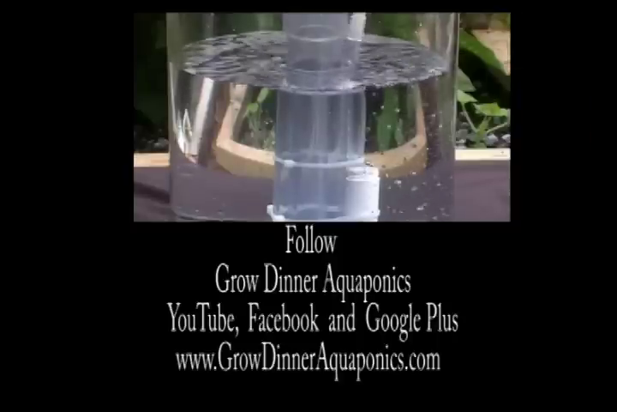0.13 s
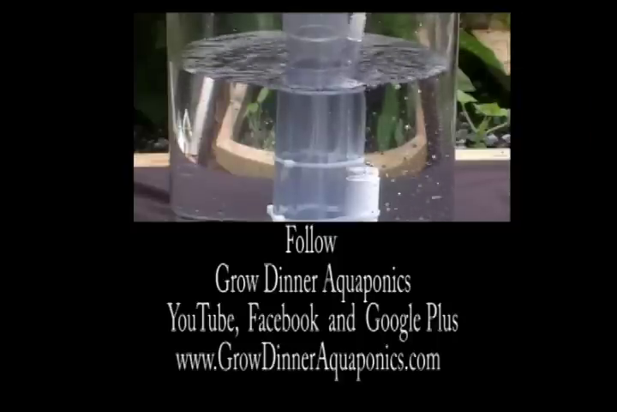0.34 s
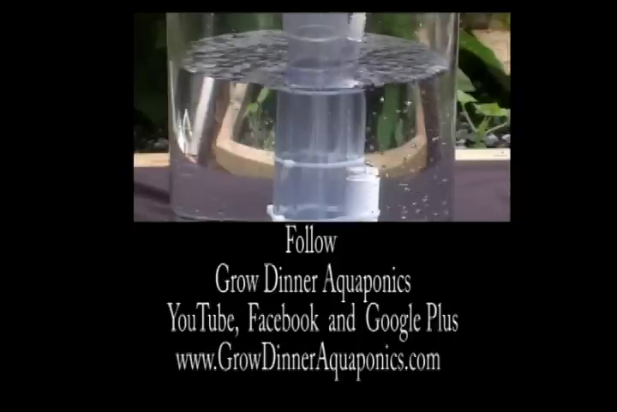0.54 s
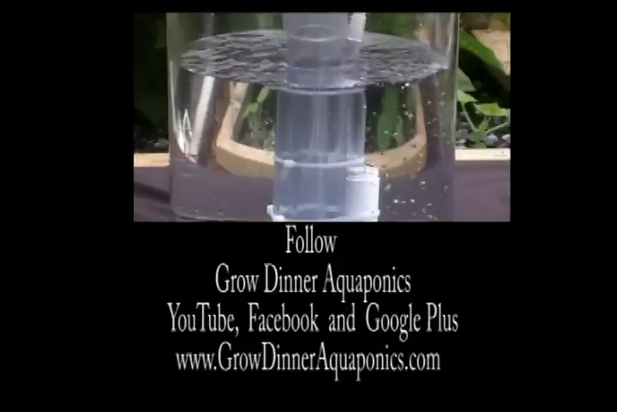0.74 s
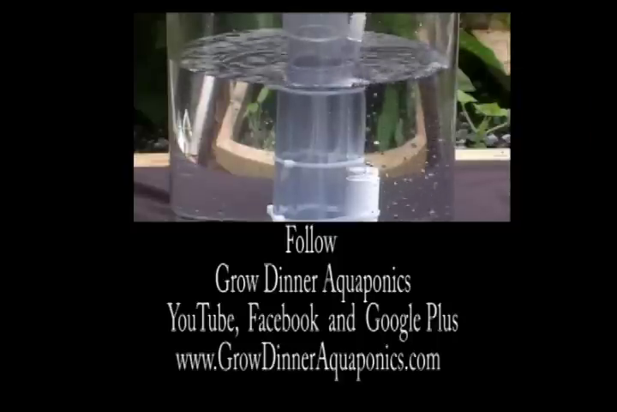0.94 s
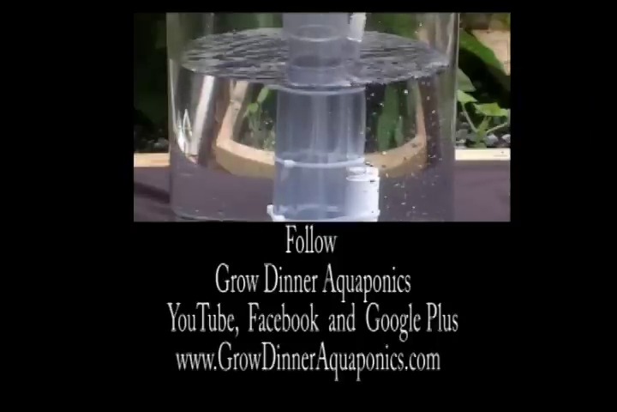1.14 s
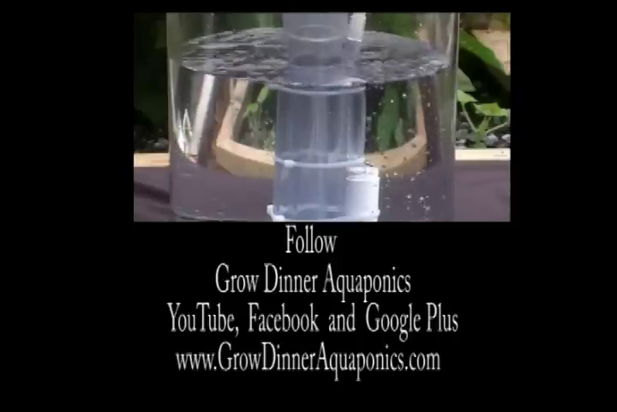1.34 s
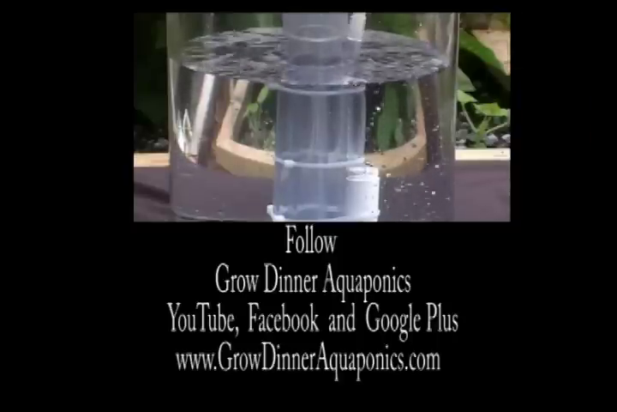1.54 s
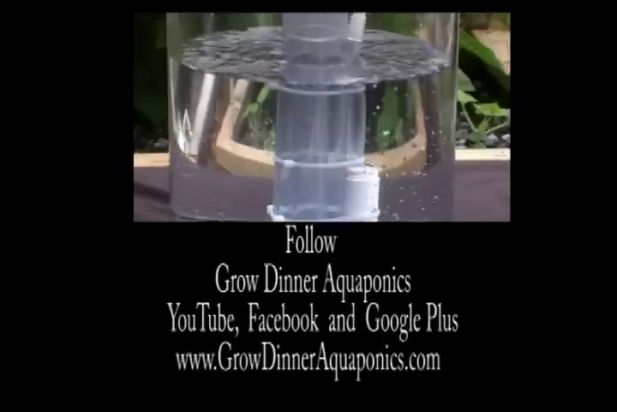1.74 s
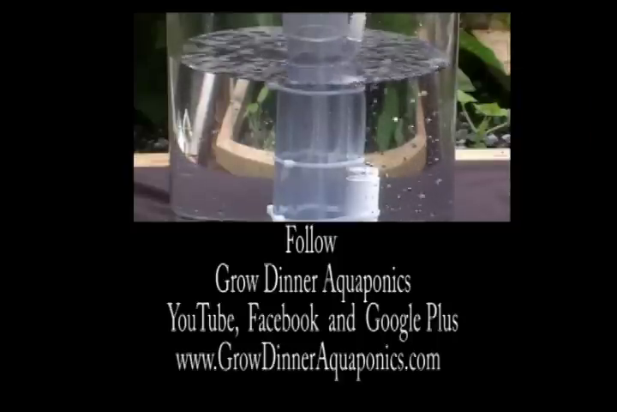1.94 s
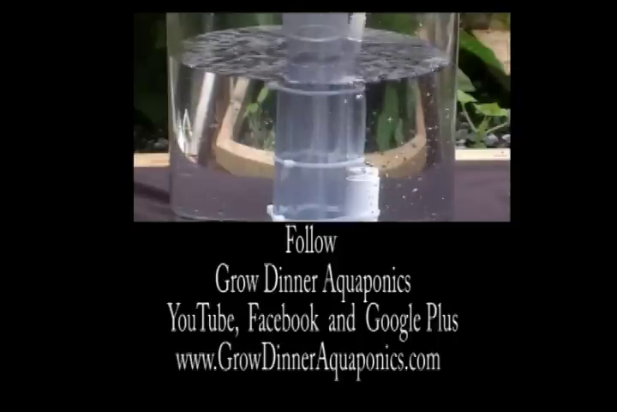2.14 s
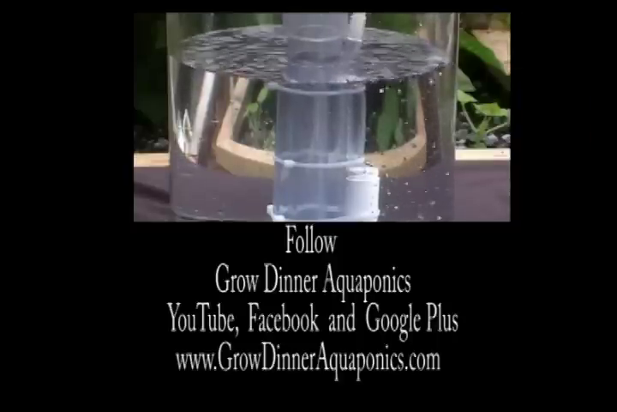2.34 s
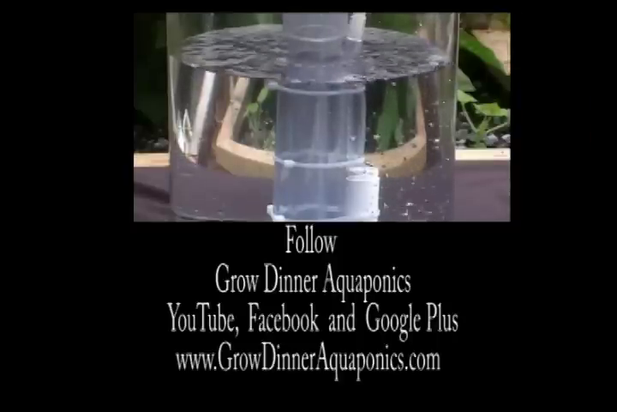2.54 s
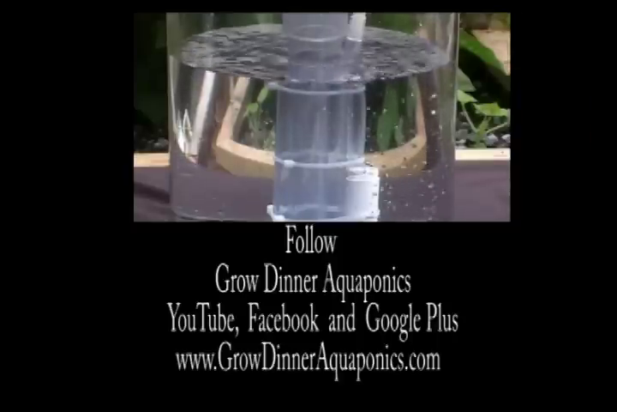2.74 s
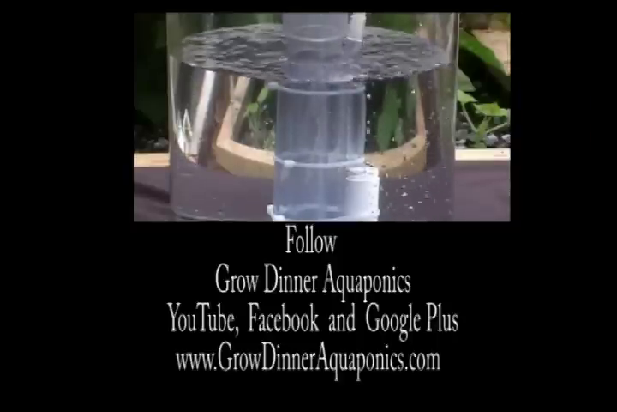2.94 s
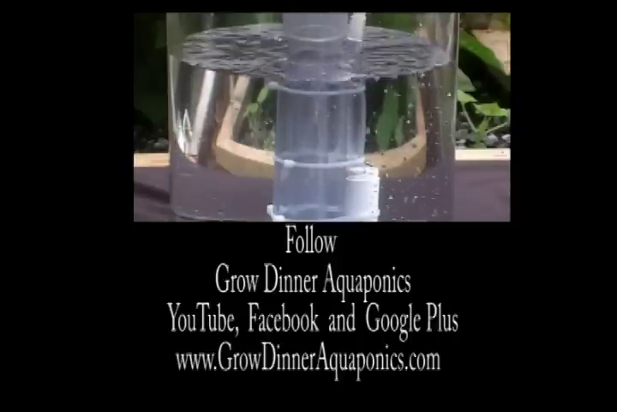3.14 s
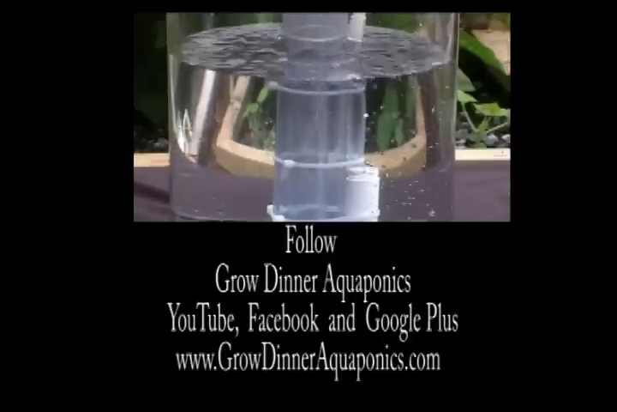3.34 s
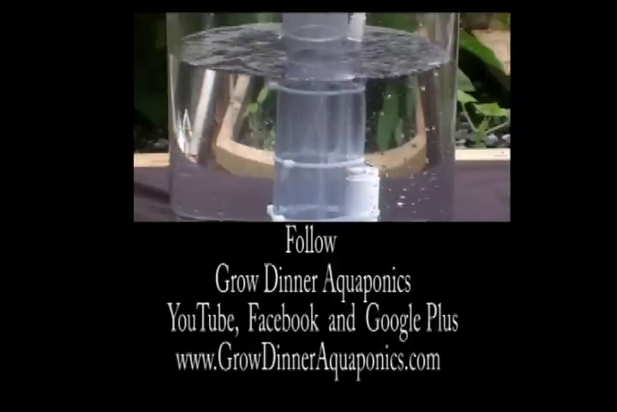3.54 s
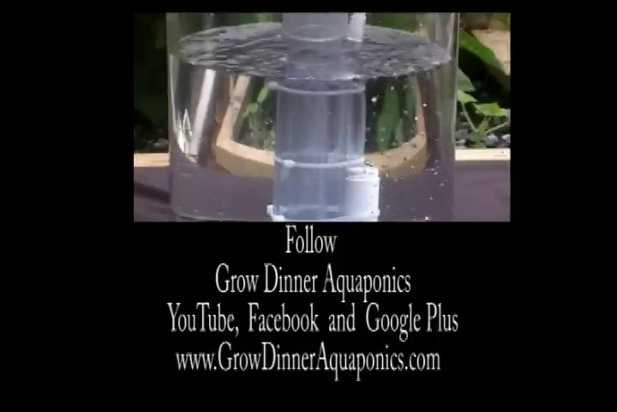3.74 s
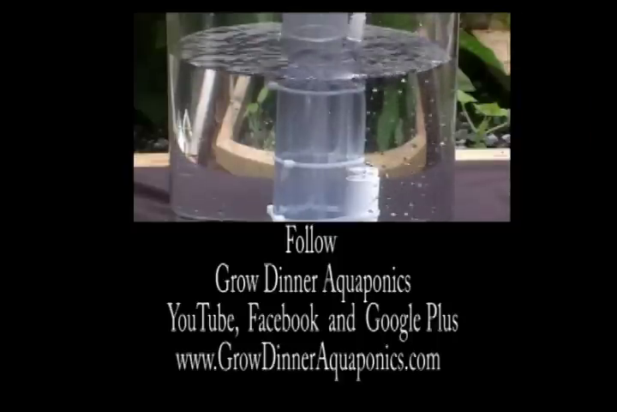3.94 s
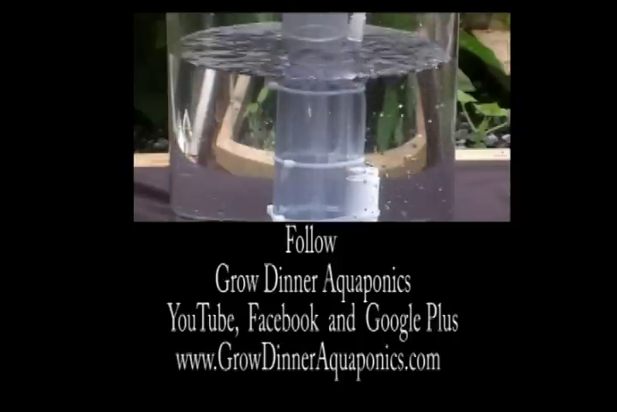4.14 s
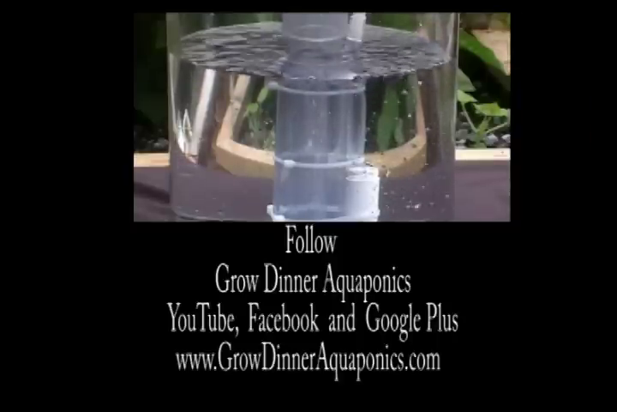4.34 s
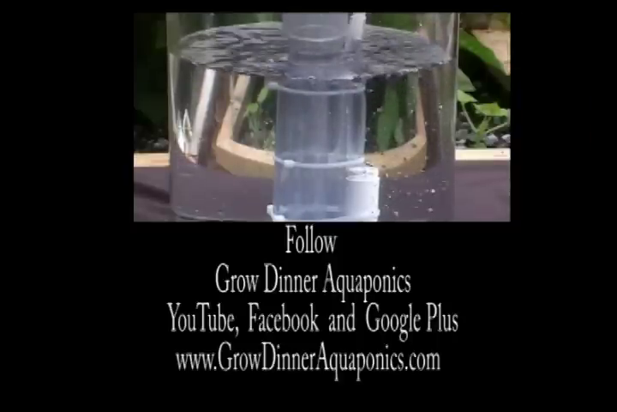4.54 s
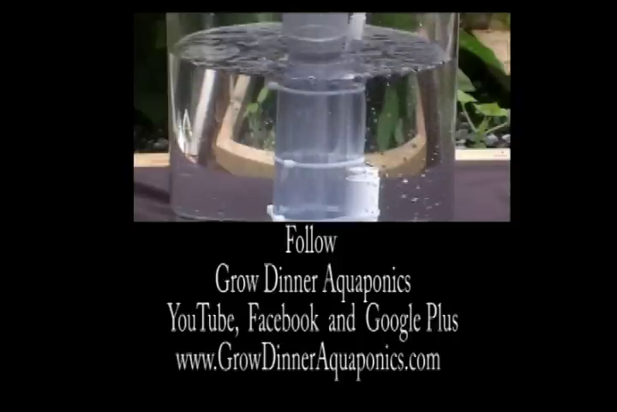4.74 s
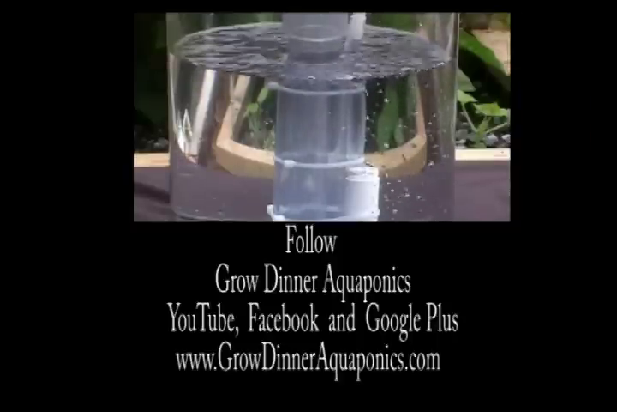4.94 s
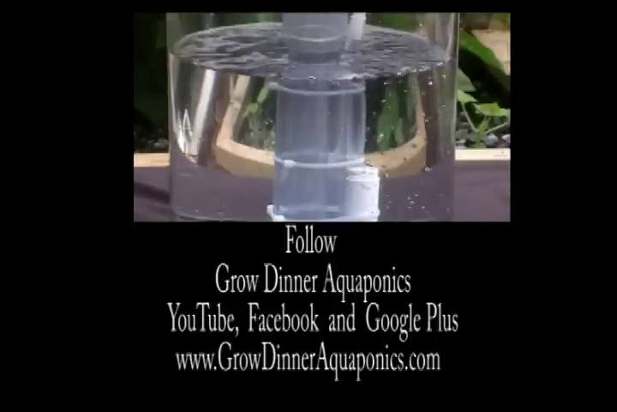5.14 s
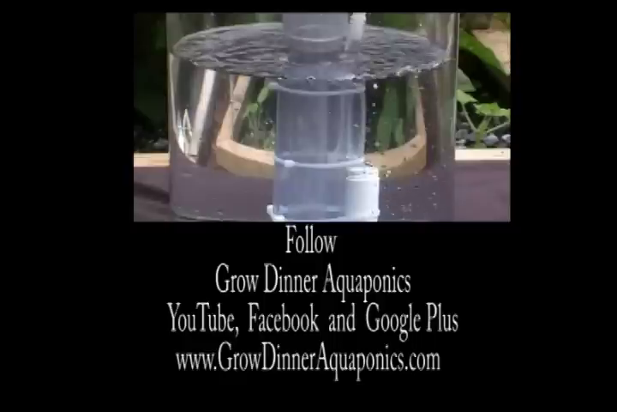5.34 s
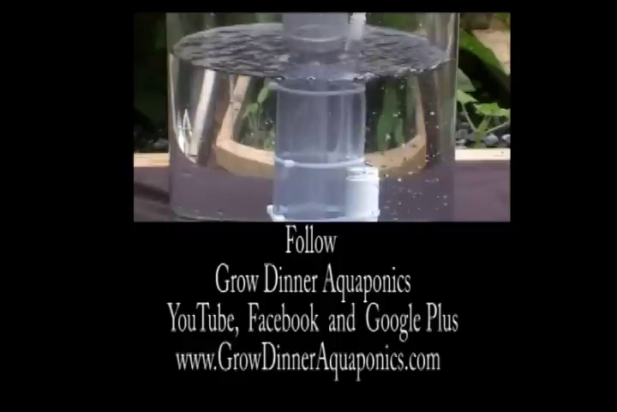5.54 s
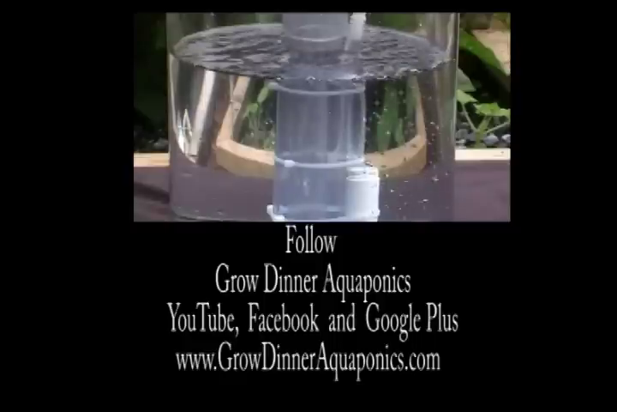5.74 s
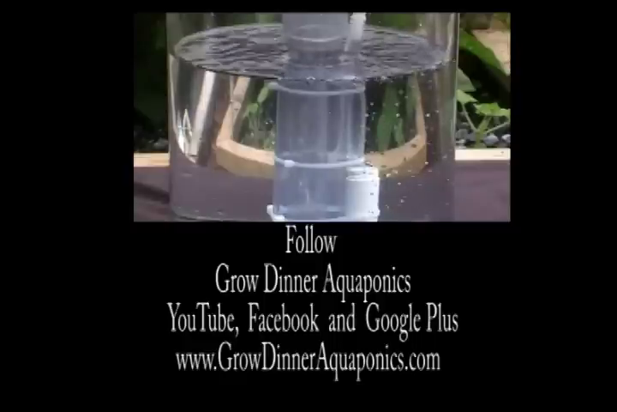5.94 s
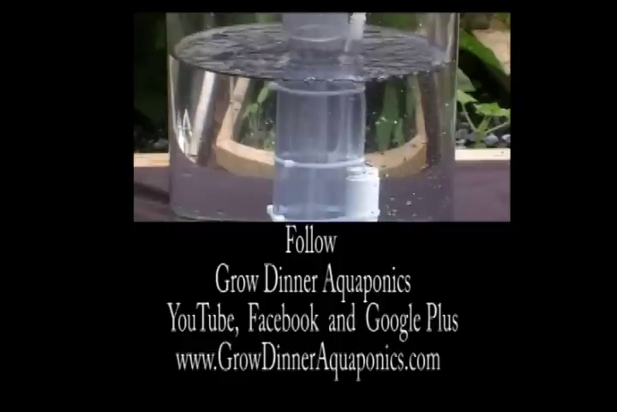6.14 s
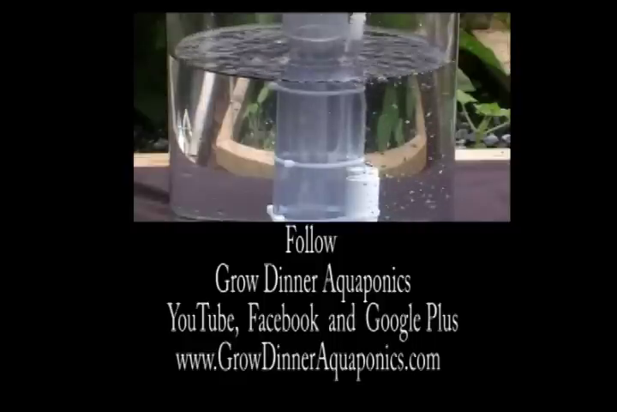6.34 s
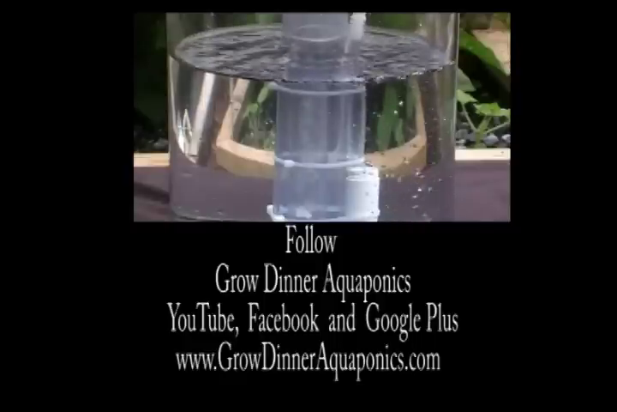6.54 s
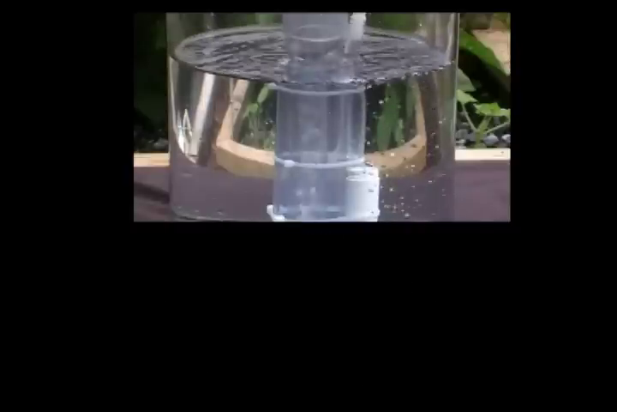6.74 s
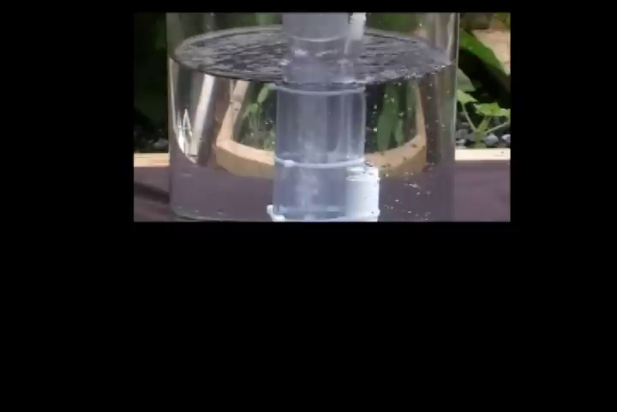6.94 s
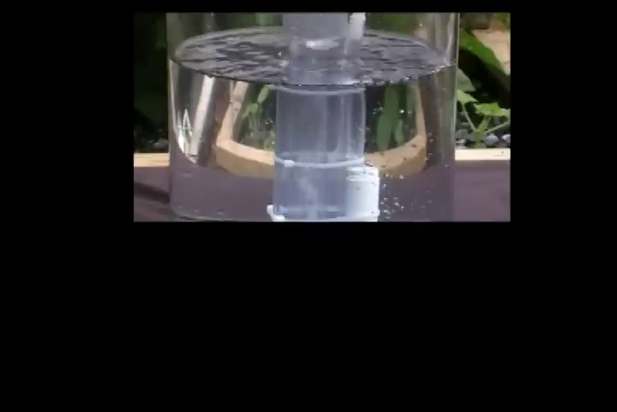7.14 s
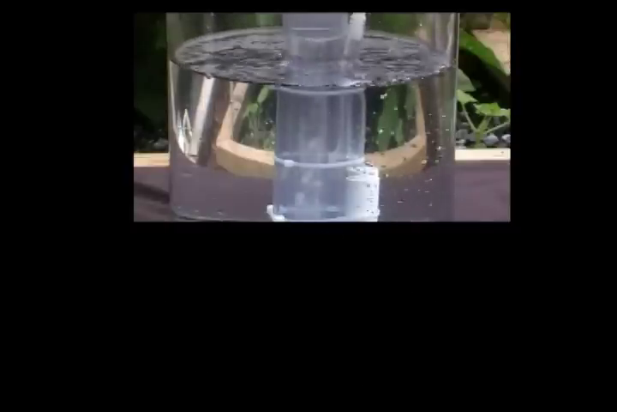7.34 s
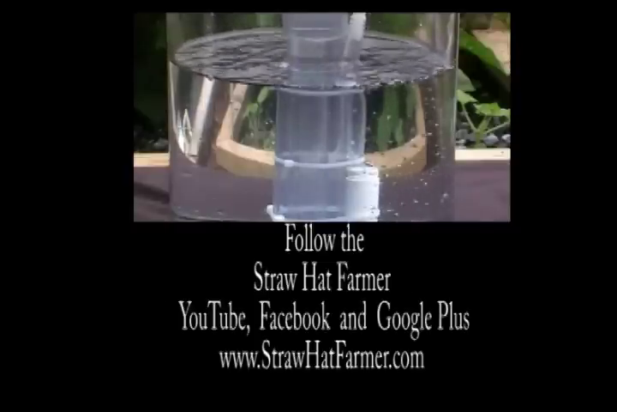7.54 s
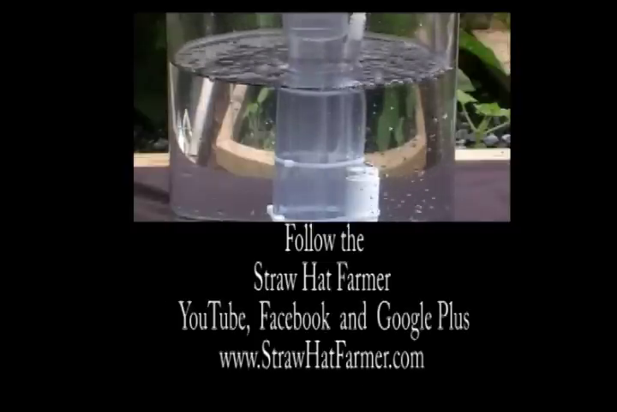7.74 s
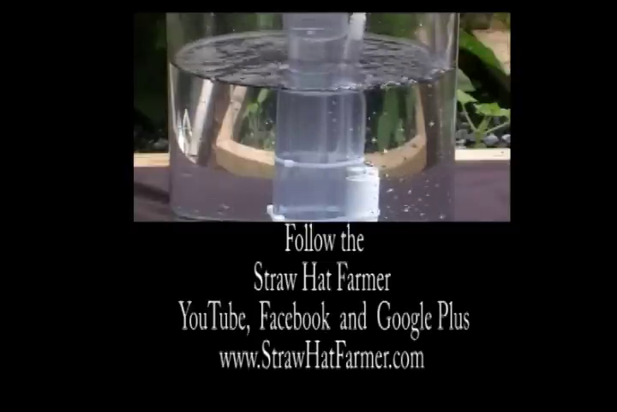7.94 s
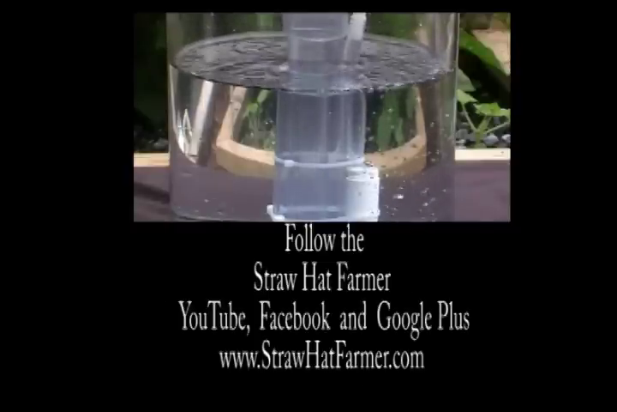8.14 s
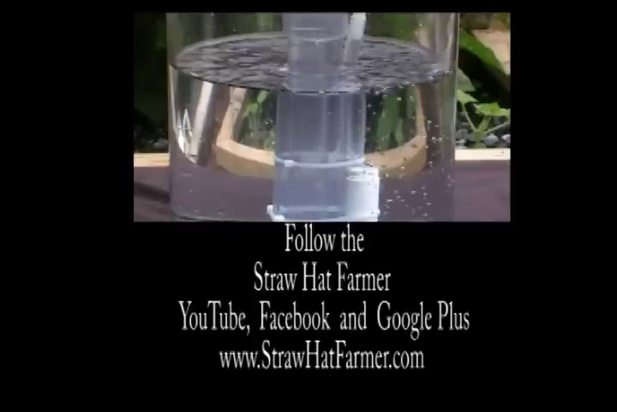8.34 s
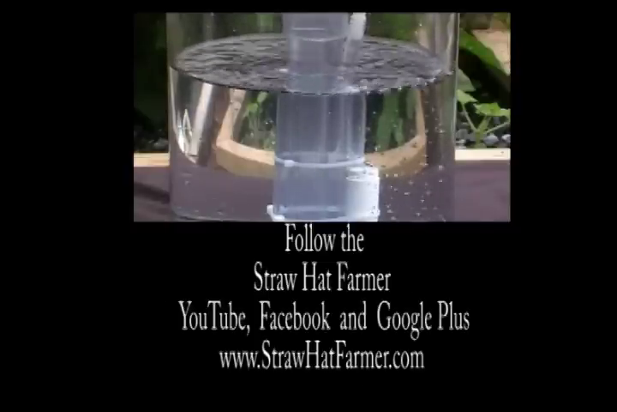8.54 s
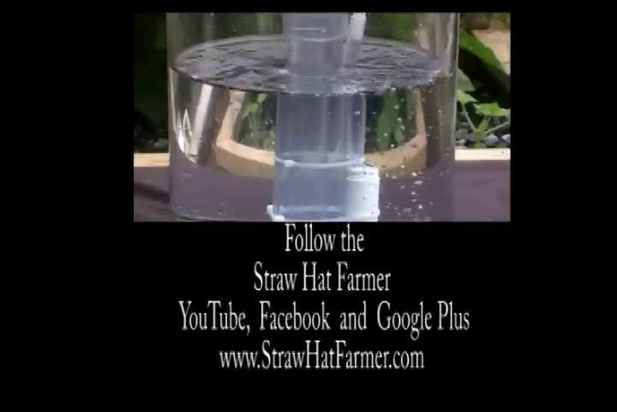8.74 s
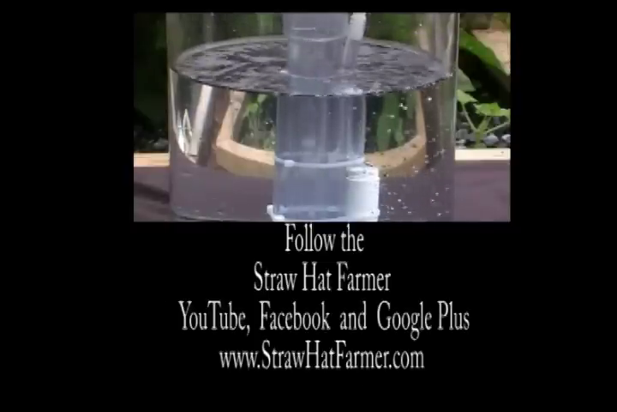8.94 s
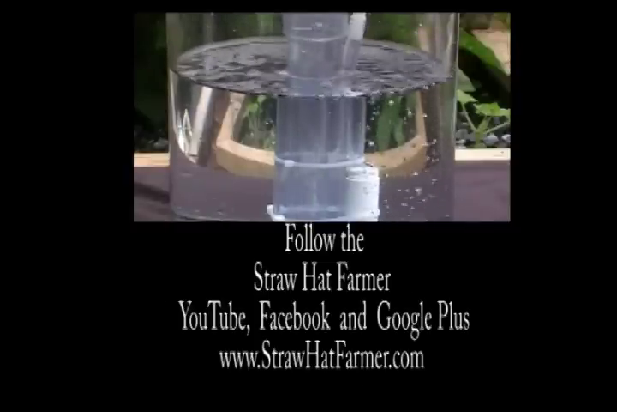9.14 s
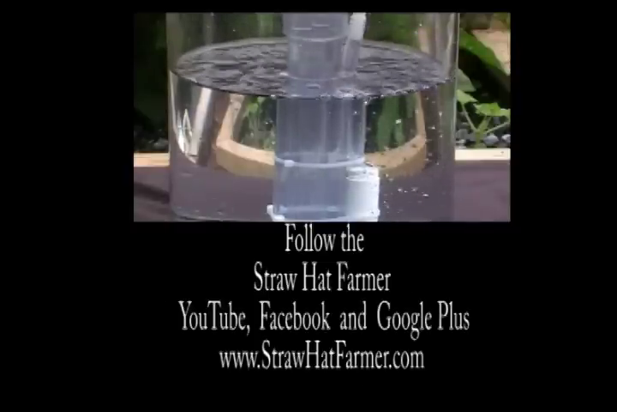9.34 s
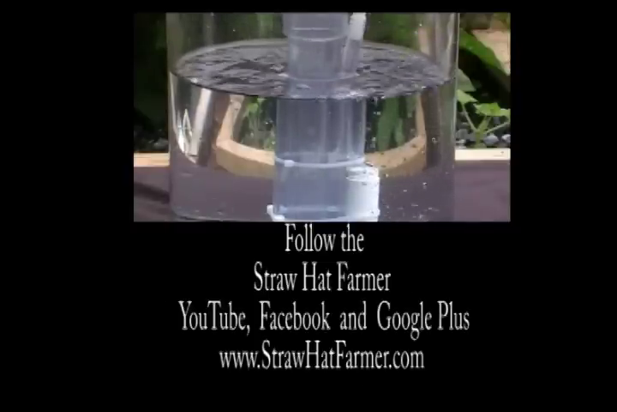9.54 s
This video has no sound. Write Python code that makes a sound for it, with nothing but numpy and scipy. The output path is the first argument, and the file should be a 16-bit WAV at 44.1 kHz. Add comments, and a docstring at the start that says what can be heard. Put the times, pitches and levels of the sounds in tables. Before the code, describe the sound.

From 0 to 4 s a quiet outdoor garden: soft wide airy hiss, a nearby trickle that swells gently at the start and again near 3 s, small clear drips with rising pitch, a thin high cricket chirping about thirteen times a second, faint steady insect whines, and low hums like far engines coming and going. At about 4.2 s a siphon begins drawing air: first separate small spits, high bubble pips and short sliding gurgles. From 5 s the bursts come faster and harder, and by 6 s it is a loud, irregular, wet sputter, with bright spray, sharp slurps, ringing air pockets and a hollow standpipe resonance, over churning low water and deep plops. Near 7 s a deeper churn joins, then sinks. The slurping rush carries on to the end at about 9.5 s, close and central, masking the garden.

```python
"""A garden, where a bell siphon drains a water tank. At first there is mostly a nearby trickle with its drops,
insects and far traffic, made of coloured noise, fizzing resonators, narrow whines and low hums.
From about 4 s the siphon draws air: slugs of water spit and slurp as bursts of banded noise, the standpipe
rings as resonant modes, and bubbles and low plops sound as short sines that climb in pitch."""
import sys
import numpy as np
from scipy import signal
from scipy.fft import rfft, irfft, next_fast_len
from scipy.io import wavfile

SR = 44100
rng = np.random.default_rng(int(sys.argv[2]) if len(sys.argv) > 2 else 0)


def digitize_waveform(pressure):
    """Quantize a signal to 16-bit integers and store it at the path in sys.argv[1].

    Rows of a 2-D input are taken as channels; values are limited to [-1, 1].
    """
    field = np.atleast_2d(pressure).T
    bounded = np.clip(field, -1, 1)
    quanta = np.round(bounded * 32767).astype(np.int16)
    wavfile.write(sys.argv[1], SR, quanta)


N = 422478   # length in samples

# loudest slugs of water bursting at the pipe mouth:
# (t/s, nominal peak level/dB, brightness/dB per octave, t60/s)
LOUD_SPITS = [(4.2561, -26, -1, 0.074), (4.306, -18.5, -2.5, 0.02), (4.3516, -28, 5, 0.027),
              (4.418, -17, -6.5, 0.031), (4.526, -17, -2, 0.023), (4.61, -20, 5, 0.021),
              (4.6556, -18.5, -4.5, 0.03), (4.77, -15.5, 2, 0.019), (4.8576, -12.5, -4, 0.025),
              (4.88, -14, -4, 0.027), (5.086, -15, -5, 0.036), (5.142, -12.5, -3, 0.023),
              (5.211, -12, 2, 0.019), (5.275, -19.5, 7, 0.039), (5.297, -20.5, 3, 0.067),
              (5.324, -19, 0, 0.025), (5.3706, -15, 1, 0.021), (5.429, -9.5, -2.5, 0.023),
              (5.471, -13.5, 10, 0.031), (5.5283, -13, 0.5, 0.033), (5.5926, -10.5, -1, 0.052),
              (5.238, -24, -5, 0.03), (5.257, -23, -4, 0.018), (4.734, -21.5, -6, 0.026),
              (5.6827, -24, -6, 0.035), (5.717, -17, 5, 0.048), (5.7572, -7.5, 5, 0.017),
              (5.7895, -26, -8, 0.13), (5.9584, -6, -2, 0.018), (5.9916, -14, 8, 0.019),
              (6.0106, -31, 9, 0.019), (6.055, -16.5, -5.5, 0.042), (6.158, -10, -2, 0.025),
              (6.1837, -22.5, 17, 0.02), (6.284, -13, 4, 0.014), (6.348, -10.5, 2.5, 0.048),
              (6.3867, -14, 2, 0.039), (6.403, -9, 2.5, 0.016), (6.433, -19, 8, 0.026),
              (6.47, -9, -1, 0.017), (6.496, -3.5, -4, 0.019), (6.5246, -19, -4, 0.026),
              (6.5716, -12.5, 1, 0.028), (6.5963, -16, -2, 0.034), (6.62, -12.5, 6, 0.032),
              (6.653, -17.5, 4, 0.059), (6.717, -13, 0, 0.051), (6.7572, -6.5, -2, 0.014),
              (6.815, -13.5, -1, 0.1), (6.9694, -23, -4, 0.015), (7.092, -14, -5, 0.021),
              (7.121, -14, 5, 0.028), (7.1989, -15.5, -9.5, 0.024), (7.2654, -9.5, -5, 0.055),
              (7.2775, -16.5, 3.5, 0.024), (7.357, -8, -3, 0.016), (7.3924, -5, 2, 0.016),
              (7.4209, -20, -8.5, 0.038), (7.5, -16.5, -4, 0.034), (7.5453, -17, 12, 0.016),
              (7.643, -29, 13, 0.024), (7.687, -20, -11, 0.022), (7.7055, -9, -2.5, 0.035),
              (7.7814, -18.5, -9.5, 0.01), (7.833, -11.5, -1, 0.025), (7.914, -17, 6, 0.061),
              (7.931, -14.5, 0.5, 0.065), (8.084, -11.5, -1, 0.049), (8.188, -19, 0, 0.038),
              (8.214, -9.5, 1.5, 0.022), (8.3912, -8.5, -6, 0.023), (8.427, -13, -3, 0.022),
              (8.52, -14, 1, 0.029), (8.5547, -10, -2, 0.016), (8.6586, -16.5, -4, 0.11),
              (8.691, -19, -1, 0.047), (8.725, -16.5, 9, 0.035), (8.741, -13.5, 3, 0.059),
              (8.8265, -5.5, 0, 0.039), (8.937, -10, 2, 0.041), (8.9894, -16, 4, 0.044),
              (9.035, -12, 1, 0.028), (9.104, -13, 4, 0.027), (9.125, -15, 7, 0.03),
              (9.2023, -10, 4, 0.022), (9.2424, -13, 1, 0.034), (9.3031, -21, -3, 0.073),
              (9.36, -11, -4, 0.022), (9.464, -19, -8, 0.024), (9.481, -24, -4, 0.018),
              (9.5116, -14, 1, 0.032), (4.2113, -31, 5, 0.033), (4.4403, -15, 4, 0.021),
              (4.4872, -24, 2, 0.019), (4.936, -21, -7, 0.041), (4.9764, -27, -9.5, 0.021),
              (5.057, -20, 5, 0.024), (5.1025, -12, -2, 0.032), (5.3344, -18.5, -7, 0.043)]
# loudest ringing air pockets: (t/s, peak level before the tone gain/dB, starting f/Hz)
LOUD_BUBBLES = [(4.351, -13, 4430), (4.4178, -11, 4300), (4.315, -35, 2270), (4.527, -17, 3140),
                (4.529, -24, 2200), (4.567, -29, 2280), (4.6167, -10, 3760), (4.657, -16, 2780),
                (4.746, -21, 3100), (4.796, -24, 2740), (4.8586, -14, 4200), (4.899, -18, 1790),
                (4.978, -17, 2880), (5.092, -8.5, 2580), (5.112, -16, 2600), (5.1447, -21, 2350),
                (5.175, -23, 2320), (5.221, -24.5, 1800), (5.124, -21, 1430), (5.335, -17.5, 2950),
                (5.3714, -24, 1950), (5.4013, -20, 1820), (5.432, -19, 2590), (5.477, -12, 2430),
                (5.495, -16.5, 2500), (5.537, -16, 2630), (5.55, -24, 2340), (5.5769, -24, 4500),
                (5.5922, -7, 3350), (5.6323, -18, 1540), (5.661, -14, 2700), (5.677, -20, 990),
                (5.7448, -12.5, 1750), (5.8004, -15, 2180), (5.865, -13.5, 2350), (5.9935, -22, 3780),
                (6.0114, -1, 3420), (6.0588, -26, 2320), (6.1616, -29, 2270), (6.223, -17, 1900),
                (6.2479, -19, 3750), (6.3098, -17, 3900), (6.3987, -13, 2440), (6.471, -31, 1880),
                (6.498, -10.5, 1880), (6.6196, -23, 1790), (6.661, -6, 1835), (6.757, -4, 3580),
                (6.7827, -18, 1470), (6.822, -4.5, 1740), (6.9139, -12, 1790), (7.267, -16, 2620),
                (7.394, -18, 1890), (7.4697, -17, 1140), (7.5426, -7, 4300), (7.5664, -24, 1160),
                (7.8338, -13, 2200), (7.939, -10.5, 1950), (8.0526, -17, 1028), (8.265, -25, 1080),
                (8.289, -25, 1055), (8.392, -14, 1950), (8.441, -16, 1063), (8.6719, -15, 1880),
                (8.692, -9, 1690), (8.819, -16, 1680), (8.8775, -8.5, 2080), (9.186, -14, 1480),
                (9.2088, -9, 2180), (9.275, -12.5, 1033), (9.3274, -12.5, 1930), (9.3933, -15, 2220),
                (9.4807, -15, 1670)]
STEADY_DRAW_S = 6   # from here on the small random spits and bubbles crowd in


def siphon():
    """Spray, pipe, churn and small bubbles follow the draw of air; a faint delayed copy widens the sound a little."""
    # strength of the draw under the single spits: (t/s, spray level/dB, pipe level/dB)
    draw = [(4.2, -41.5, -61), (4.46, -43.5, -47.5), (4.88, -40, -82), (5.51, -37, -38.5),
            (5.93, -30, -31.5), (6.62, -35.5, -33.5), (6.97, -34.5, -31.5), (7.81, -33, -31.5),
            (8.46, -34.5, -31), (8.58, -34, -28.5), (9.58, -33, -32)]
    # spectrum of the delayed copy in the side channel: (f/Hz, side minus mid level/dB)
    copy_side = [(60, -17), (500, -24), (1200, -76), (15000, -39)]
    spray_db, pipe_db = level_curves(draw)
    shared = surges(per_s=70, spread_db=3.0, t60=.06, rise_s=.004)
    mid = spray(spray_db, shared) + pipe(pipe_db, shared)
    mid += bubbles(pipe_db) + low_plops() + clusters() + slides()
    mid += churn(pipe_db) + deep_churn()
    delayed = np.roll(mid, 310)   # 7 ms
    delayed_copy = filtered(delayed, lambda hz: at_hz(copy_side, hz))
    return mid + delayed_copy * [[1], [-1]]


def spray(spray_db, shared):
    """Hiss and fine bubbles in bands: each spit has its own tilt and reaches the bands unevenly."""
    # colour of the spray: (f/Hz, level/dB per Hz)
    spray_colour = [(410, 11.5), (700, -3), (907, -33), (1030, 1), (1240, -18), (1850, -9.5), (3110, -7),
                    (3630, -3), (8880, 0), (11500, -9.5), (15500, -31.5)]
    pivot_hz = 5500   # brightness tilts about this
    crest_db = 14.5   # peak of the hiss over its mean level
    small_over_db, small_tilt_db = 12, 5.5   # random spits: top level over the spray, spread of brightness
    latest_s = .005   # scale of the random lag between bands, halved below

    fine = fizz(4000, 1500, 12000, cycles=45, spread_db=2.5)
    wet = .55 * rng.standard_normal(N) + .75 * fine
    small = [(s, db, small_tilt_db * (1 - 2 * tilt), 0.022 + 0.13 * long)
             for s, db, tilt, long in scattered(count=16, level_db=spray_db, over_db=small_over_db)]
    spits = [*LOUD_SPITS, *small]
    chance = rng.standard_normal((len(spits), 7, 2))
    edges, out = np.geomspace(600, 17000, num=8), 0
    for k, (low, high) in enumerate(zip(edges, edges[1:])):
        own = surges(70, 2.5, .04, .007)
        loud = amp(spray_db - 1.5) * (.55 + .25 * shared + .35 * own)
        octaves = np.log2(np.sqrt(low * high) / pivot_hz)
        low_loss_db = 8 * max(-1.5 - octaves, 0)   # spits are thin in the lowest bands
        for (s, db, tilt_db, t60), (luck, late) in zip(spits, chance[:, k]):
            band_db = db - crest_db + tilt_db * octaves + 2.5 * luck - low_loss_db
            start_s = s - .001 + latest_s * abs(late) / 2
            add(loud, start_s, burst(band_db, t60, rise_s=0.1 * t60))
        band = signal.sosfilt(signal.butter(2, [low, high], "band", fs=SR, output="sos"), wet)
        out = out + loud * band * (-1) ** k   # alternate polarity between neighbours
    pivot_db = at_hz(spray_colour, pivot_hz)
    return filtered(out, lambda hz: at_hz(spray_colour, hz) - pivot_db)


def pipe(pipe_db, shared):
    """Turbulence and bursting bubbles at the mouth sound the standpipe's modes, each swelling on its own."""
    # modes of the standpipe: (f/Hz, width/Hz, level/dB)
    pipe_modes = [(350, 54, -4.5), (1059, 90, 0.5), (1460, 210, -2), (1880, 150, 2.5), (2280, 51, 4.5),
                  (2630, 300, -4), (3700, 100, -5.5)]
    stir_db = -20.5   # how much a loud bubble stirs the pipe
    loud = amp(pipe_db) * (0.75 + 0.35 * shared)
    for s, db, hz in LOUD_BUBBLES:
        reach_db = -30 * max(np.log2(hz / 2400), 0)   # small high bubbles hardly stir the pipe
        add(loud, s, burst(db + stir_db + reach_db, t60=0.052, rise_s=0.0013))
    small = fizz(500, 900, 3500, cycles=35, spread_db=3.5)
    breath = (.75 * rng.standard_normal(N) + .4 * small) * loud
    out = 0
    for k, (hz, width, db) in enumerate(pipe_modes):
        swell = 0.27 + 0.17 * surges(60, 3.4, 0.11, 0.0083) + 0.12 * surges(19, 1.0, 0.13, 0.018)
        mode = amp(db) * resonance(breath * swell, hz, width)
        out = out + mode * (-1) ** k
    # what unit noise leaves in the modes
    norm = np.sqrt(sum(amp(2 * db) * np.pi * width / SR for hz, width, db in pipe_modes))
    return out / norm


def bubbles(pipe_db):
    """Air pockets ring as rising sines, loud ones at set times and small ones at random in the steady draw."""
    small = [(s, db, 1000 * 3 ** pitch, 24)
             for s, db, pitch, _ in scattered(count=600, level_db=pipe_db, over_db=3.5)]
    loud = [(*row, 45) for row in LOUD_BUBBLES]
    tones = blips(loud + small, rise_s=.0015, glide=.08, gain_db=-4)
    return tones * (.85 + .35 * narrow(220, 300))   # rough flutter


def low_plops():
    """Low sines that climb only slightly: drops of the trickle before 4 s, large bubbles of the siphon after."""
    # low plops: (t/s, peak level before the tone gain/dB, starting f/Hz)
    plops = [(0.037, -50, 454), (0.482, -50, 480), (2.873, -48, 432), (3.081, -46, 474),
             (3.567, -45.5, 458), (4.439, -39.5, 700), (4.532, -44, 690), (4.814, -38.5, 413),
             (5.439, -40.5, 470), (5.605, -36, 350), (5.759, -37.5, 412), (5.816, -35, 374),
             (5.969, -38, 446), (6.113, -39, 425), (6.214, -36, 667), (6.248, -33, 350), (6.285, -34, 414),
             (6.495, -36, 354), (6.906, -31, 735), (7.476, -35.5, 350), (8.045, -41, 337),
             (8.405, -43, 326), (8.525, -35, 606), (9.17, -39, 437)]
    return blips([(*row, 34) for row in plops], rise_s=0.0016, glide=0.023, gain_db=4.5)


def clusters():
    """Each loud spit sheds five small bubbles at random pitches just after it."""
    under_db, spread_s, low_hz, octaves = -15.5, 0.022, 1406, 1.5   # level against the spit, spread, pitch range
    chance = rng.random((len(LOUD_SPITS), 5, 3))
    shed = [(s + spread_s * late, db + under_db - 8 * size, low_hz * 2 ** (octaves * pitch), 38)
            for (s, db, *_), five in zip(LOUD_SPITS, chance) for late, size, pitch in five]
    return blips(shed, rise_s=0.00099, glide=0.1, gain_db=-3.5)


def slides():
    """Each gurgle is a sine that slides in pitch under a rounded swell, broken by a fast flutter."""
    # sliding gurgles: (t/s, peak level before the flutter/dB, first f/Hz, last f/Hz, length/s)
    gurgles = [(4.406, -31.5, 1433, 1605, 0.022), (4.481, -39, 605, 666, 0.041),
               (4.671, -32, 2130, 1830, 0.023), (4.937, -33.5, 594, 1300, 0.032),
               (5.182, -30, 1140, 1860, 0.0214), (7.199, -26, 1920, 990, 0.06)]
    out = np.zeros(N)
    for s, db, first_hz, last_hz, length in gurgles:
        x = np.linspace(0, 1, int(length * SR))
        turns = length * (first_hz * x + (last_hz - first_hz) * x * x / 2)
        add(out, s, amp(db) * np.sin(np.pi * x) * np.sin(2 * np.pi * turns))
    return out * (.7 + .35 * narrow(170, 200))


def churn(pipe_db):
    """Low water noise surges and follows most of the pipe's swing in level."""
    # colour of the churn: (f/Hz, level/dB per Hz)
    churn_colour = [(150, -11), (280, -6), (450, 2), (800, 2.5), (1200, -30)]
    full_db, follows = -45, 0.79   # before surges, at full pipe tone; share of the pipe's swing
    churn_db = full_db + follows * (pipe_db - pipe_db.max())
    surge = 0.29 + 0.5 * surges(40, 5.6, 0.063, 0.0058)
    return amp(churn_db) * surge * coloured(churn_colour)


def deep_churn():
    """A deep churn of two low noise resonances sets in late and sinks."""
    start_s, attack_s, start_db, sag_db_per_s = 6.87, 0.16, -50, 4   # level before surges
    since = np.arange(N) / SR - start_s
    level = np.clip(since / attack_s, 0, 1) * amp(start_db - sag_db_per_s * since)
    surge = 0.48 + .5 * surges(20, 4.4, 0.13, 0.01)
    return level * surge * (narrow(199, 82) + 0.27 * narrow(120, 56))


def garden():
    """Wide air and a trickle, with drops, insects and low tones in the centre."""
    # colour of the air: (f/Hz, level/dB per Hz)
    air_colour = [(25, -33), (70, -18), (110, -5), (200, -11.5), (280, -7.5), (470, -5.5), (570, -7),
                  (820, -5.5), (1300, -5), (2100, -6.5), (2700, -8.5), (3700, -5.5), (5100, -6.5),
                  (5600, -6), (6700, -6.5), (7250, -7.5), (8100, -4), (8650, -12), (9400, -8.5),
                  (10300, -24.5), (15000, -41)]
    # width of the air: (f/Hz, side minus mid level/dB)
    air_side = [(60, -8), (110, -10.5), (200, -4), (380, -5.5), (700, -4), (1290, -16.5), (2380, -14.5),
                (4400, -14), (8120, 4), (15000, -12)]
    # balance: (f/Hz, left minus right level/dB)
    balance = [(200, 0), (1290, -2.5), (8120, 2)]
    bed_db = -46.5
    # stereo width above 1.1 kHz closes around 5 s
    width_closes_s, width_drop_db, split_hz = 5.16, -23.5, 1100

    mid = swelling(coloured(air_colour)) + trickle()
    side = filtered(coloured(air_colour), lambda hz: at_hz(air_side, hz))
    low = signal.sosfilt(signal.butter(4, split_hz, fs=SR, output="sos"), side)
    high = signal.sosfilt(signal.butter(4, split_hz, "high", fs=SR, output="sos"), side)
    side = low + high * amp(slow_step(width_drop_db, width_closes_s, 0.38))
    left = filtered(mid + side, lambda hz: at_hz(balance, hz) / 2)
    right = filtered(mid - side, lambda hz: -at_hz(balance, hz) / 2)
    centre = drips() + cricket() + whines() + hums() + drone() + rumble()
    return amp(bed_db) * np.array([left, right]) + centre


def trickle():
    """Dense small bubbles surge gently and swell over the air."""
    # swells of the trickle: (t/s, level against the air before surges/dB)
    trickle_swells = [(0, -7), (1.1, -12.5), (2.1, -14), (2.8, -5), (3.8, -12)]
    bubbling = fizz(1300, 900, 2500, cycles=50, spread_db=2.5)
    return amp(level_curves(trickle_swells)[0]) * bubbling * (0.55 + 0.38 * surges(4.0, 1.5, 0.28, 0.03))


def swelling(x):
    """Split a hiss into broad bands and let each swell slowly."""
    edges, out = np.geomspace(20, 18000, num=14), 0
    for low, high in zip(edges, edges[1:]):
        slow_db = np.interp(np.arange(N), np.linspace(0, N, num=60), rng.standard_normal(60))
        band = filtered(x, lambda hz: np.where((hz >= low) & (hz < high), 0, -200))
        out = out + amp(slow_db) * band
    return out


def drips():
    """Drops of the trickle: a slightly rising sine and a splash each, with fainter drops at random."""
    # clear drops: (t/s, peak level before the tone gain/dB, starting f/Hz)
    clear_drops = [(0.095, -38, 3700), (0.9612, -40, 3140), (1.8497, -50, 2007), (1.95, -43, 1324),
                   (3.5553, -44, 1970), (3.9424, -39, 2370), (0.5585, -43, 1330), (1.158, -45, 1280),
                   (1.5574, -36, 3210), (1.5812, -39, 1965), (2.5601, -40, 2180), (2.746, -41, 1630),
                   (2.685, -41, 1640), (2.765, -46, 1620), (2.7856, -41, 1610), (2.908, -44, 1640),
                   (3.085, -42, 1610), (3.135, -42, 1660), (2.9766, -40, 1340), (3.1068, -41, 1620),
                   (3.3079, -42, 2190), (4.1574, -43, 1100)]
    faint = [(9 * s, -42.5 - 6 * size, 1000 * 2.4 ** pitch) for s, size, pitch in rng.random((90, 3))]
    drops = [*clear_drops, *faint]
    tones = blips([(*row, 45) for row in drops], rise_s=0.0019, glide=0.031, gain_db=5.0)
    return tones + splashes(drops)


def splashes(drops):
    """Each drop lands with a short tick of broad noise."""
    loud = np.zeros(N)
    for s, db, hz in drops:
        add(loud, s, burst(db - 6, t60=.03, rise_s=0.0015))
    return loud * narrow(2600, 3700)


def cricket():
    """A narrow noise whine carries regular short chirps of uneven strength."""
    hz, width_hz, level_db = 6410, 150, -58.5   # level before the chirps shape it
    chirps_per_s, first_chirp_s, sharpness = 12.75, 0.023, 1.9
    turn = np.pi * chirps_per_s * (np.arange(N) / SR - first_chirp_s)
    strength = amp(1.5 * rng.standard_normal(140))[(turn / np.pi + .5).astype(int)]
    chirps = strength * np.abs(np.cos(turn)) ** sharpness
    return amp(level_db) * (0.83 + chirps) * narrow(hz, width_hz)


def whines():
    """Faint steady insect-like whines, each a narrow band of noise."""
    # whines: (f/Hz, width/Hz, level/dB)
    faint_whines = [(827, 56, -62.5), (1640, 56, -77), (4170, 110, -67), (4700, 90, -64), (7880, 600, -65)]
    return sum(amp(db) * narrow(hz, width) for hz, width, db in faint_whines)


def hums():
    """Low hums come and go, perhaps far engines: gliding sines roughened by narrow noise."""
    # hums: (start t/s, end t/s, first f/Hz, last f/Hz, sine level/dB)
    low_hums = [(0, 2.55, 132, 133.5, -66.5), (1.05, 2.02, 239, 233, -67.5), (2.55, 3.75, 96, 86, -65.5),
                (2.8, 3.38, 228, 217.6, -66.5)]
    fade_s, roughness = .08, 0.19
    t, out = np.arange(N) / SR, 0
    for start, end, first_hz, last_hz, db in low_hums:
        gate = np.clip(np.minimum(t - start, end - t) / fade_s + .5, 0, 1)
        phase = 2 * np.pi * np.cumsum(np.interp(t, [start, end], [first_hz, last_hz])) / SR
        rough = roughness * narrow((first_hz + last_hz) / 2, 25)
        out = out + amp(db) * gate * (np.sqrt(2) * np.sin(phase) + rough)
    return out


def drone():
    """A low drone of narrow noise bands sinks 7.5 dB over about a second around 4.6 s."""
    # drone bands: (f/Hz, width/Hz, level before it sinks/dB)
    low_bands = [(96, 40, -74), (155, 110, -62.5), (224, 160, -69.5)]
    return amp(slow_step(-7.5, 4.6, 0.21)) * sum(amp(db) * narrow(hz, width) for hz, width, db in low_bands)


def rumble():
    """A 44 Hz rumble of narrow noise grows slowly."""
    start_db, end_db = -88, -77
    return amp(start_db + slow_step(end_db - start_db, 2.5, 0.99)) * narrow(44, 24.4)


def amp(db):
    """Decibels to gain."""
    return 10 ** (np.asarray(db) / 20)


def rms_one(x):
    """Scale to rms 1."""
    return x / np.sqrt(np.mean(x ** 2) + 1e-20)


def level_curves(rows):
    """Level columns sample by sample, climbing 40 dB in the fifth of a second before the first row."""
    s, *columns = np.transpose(rows)
    return [np.interp(np.arange(N) / SR, [s[0] - .2, *s], [c[0] - 40, *c]) for c in columns]


def slow_step(size_db, middle_s, slope_s):
    """Smooth S-shaped step in level from 0 to size_db."""
    return size_db / (1 + np.exp((middle_s - np.arange(N) / SR) / slope_s))


def at_hz(points, hz):
    """Read a spectrum on a log frequency axis."""
    return np.interp(np.log(hz), np.log(np.array(points)[:, 0]), np.array(points)[:, 1])


def filtered(x, gain_db_at):
    """Apply a gain given as a function of frequency."""
    size = next_fast_len(N)
    gain = amp(gain_db_at(np.maximum(np.arange(size // 2 + 1) * SR / size, 1)))
    return irfft(rfft(x, size) * gain, size)[..., :N]


def coloured(spectrum):
    """Noise of a given spectrum; rms 1."""
    return rms_one(filtered(rng.standard_normal(N), lambda hz: at_hz(spectrum, hz)))


def resonance(x, hz, width_hz):
    """Two-pole peak of gain 1."""
    r = np.exp(-np.pi * width_hz / SR)
    poles = [1, -2 * r * np.cos(2 * np.pi * hz / SR), r * r]
    return signal.lfilter([(1 - r * r) / 2, 0, (r * r - 1) / 2], poles, x)


def narrow(hz, width_hz):
    """Noise twice through a resonance; rms 1."""
    return rms_one(resonance(resonance(rng.standard_normal(N), hz, width_hz), hz, width_hz))


def surges(per_s, spread_db, t60, rise_s):
    """Envelope of random surges with a quick rise and slower fall; rms 1."""
    born = (rng.random(N) < per_s / SR) * amp(spread_db * np.minimum(rng.exponential(1, N), 3))
    fall, rise = amp(-60 / (t60 * SR)), np.exp(-1 / (rise_s * SR))
    return rms_one(signal.lfilter([1], np.convolve([1, -fall], [1, -rise]), born + 1e-18))


def burst(db, t60, rise_s):
    """Envelope of one burst that peaks at db."""
    t = np.arange(SR // 8) / SR
    shape = (1 - np.exp(-t / rise_s)) ** 2 * amp(-60 * t / max(t60, .008))
    return amp(db) * shape / shape.max()


def add(out, s, piece):
    """Mix a piece in at a time."""
    i = max(round(s * SR), 0)
    out[i:i + len(piece)] += piece[:N - i]


def blips(events, rise_s, glide, gain_db):
    """Each drop or bubble is a sine that swells and dies over some cycles, its pitch climbing."""
    out = np.zeros(N)
    for (s, db, hz, cycles), phase in zip(events, rng.random((len(events), 1))):
        t = np.arange(int(SR * cycles / hz)) / SR
        age = t * hz / cycles   # 0 to 1
        shape = (1 - np.exp(-t / rise_s)) * amp(db + gain_db - 60 * age ** 1.13)
        add(out, s, shape * np.sin(2 * np.pi * (phase + hz * t * (1 + glide * age))))
    return out


def fizz(per_s, low_hz, high_hz, cycles, spread_db):
    """Dense small bubbles: random clicks dealt to short resonators; rms 1."""
    strength = amp(spread_db * np.minimum(rng.exponential(1, N), 4))
    clicks = (rng.random(N) < per_s / SR) * strength * rng.choice([-1, 1], N)
    dealt, out = rng.integers(0, 16, N), 0
    for k, hz in enumerate(np.geomspace(low_hz, high_hz, num=16)):
        width_hz = np.log(1000) / np.pi * hz / cycles   # dies 60 dB in this many cycles
        out = out + resonance(clicks * (dealt == k) + 1e-18, hz, width_hz) / np.sqrt(hz)
    return rms_one(out)


def scattered(count, level_db, over_db):
    """Random moments of the steady draw, each with a level set against the bed and two spare draws."""
    when, size, *spare = rng.random((count, 4)).T
    s = STEADY_DRAW_S + when * (N / SR - STEADY_DRAW_S - .05)
    return zip(s, level_db[(s * SR).astype(int)] + over_db - 9 * size, *spare)


def scene():
    """The siphon stands in the centre of the wide garden."""
    return siphon() + garden()


def record(dry):
    """A steep low-pass cuts the top, 60 dB down from 15950 Hz."""
    return signal.sosfilt(signal.cheby2(24, 60, 15950, fs=SR, output="sos"), dry)


dry = scene()
out = record(dry)
digitize_waveform(out)
```